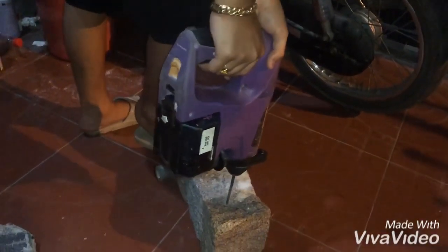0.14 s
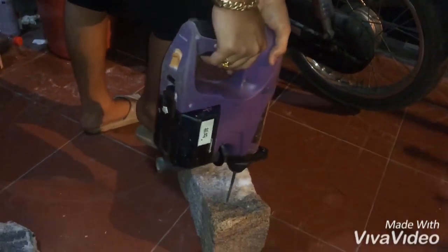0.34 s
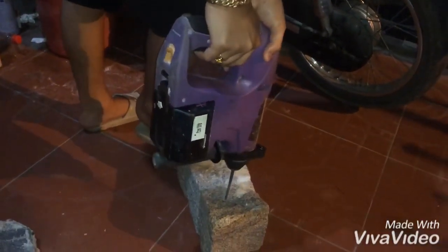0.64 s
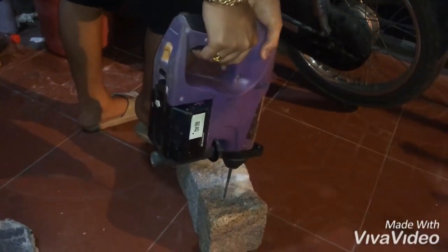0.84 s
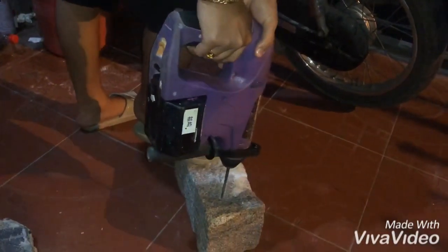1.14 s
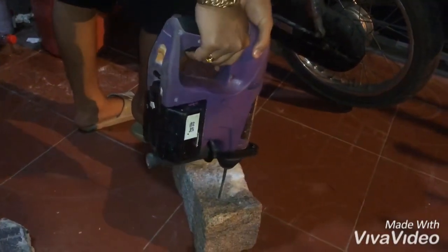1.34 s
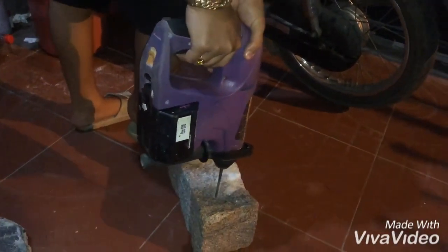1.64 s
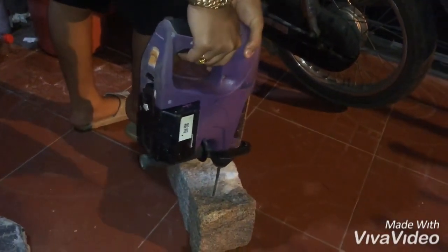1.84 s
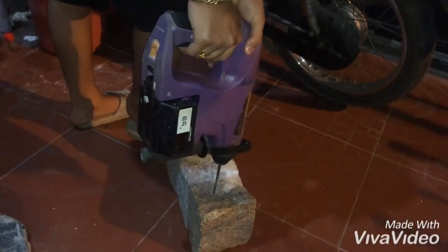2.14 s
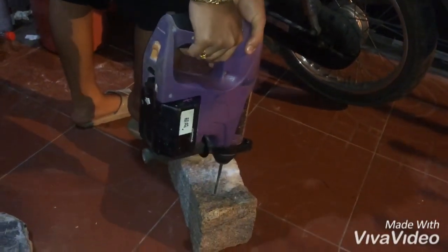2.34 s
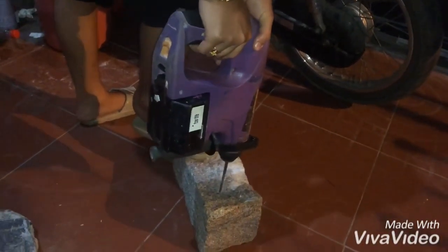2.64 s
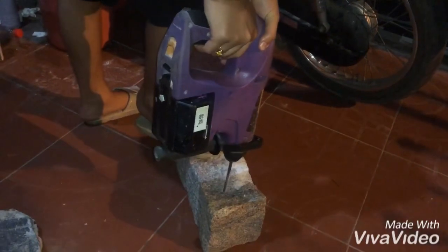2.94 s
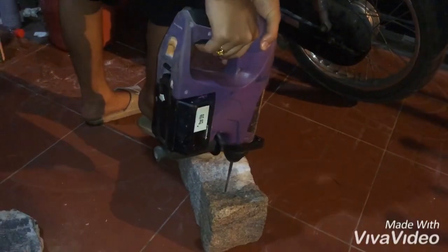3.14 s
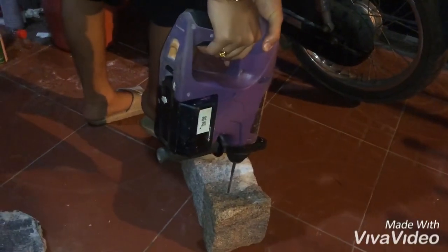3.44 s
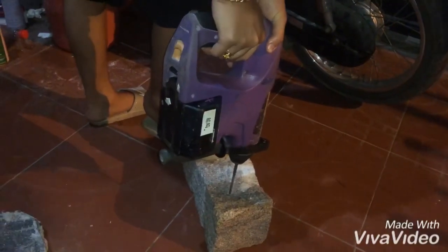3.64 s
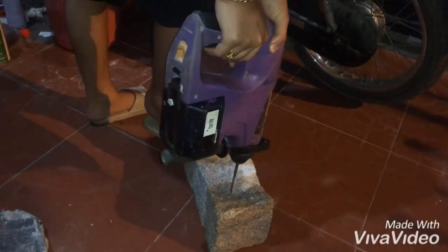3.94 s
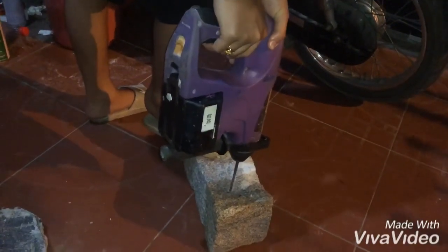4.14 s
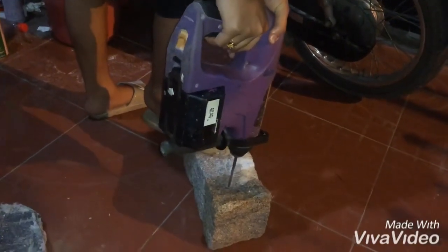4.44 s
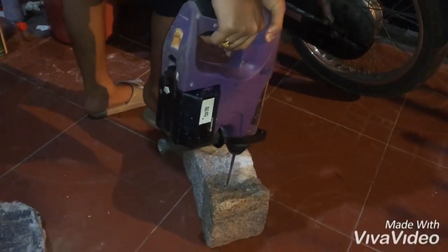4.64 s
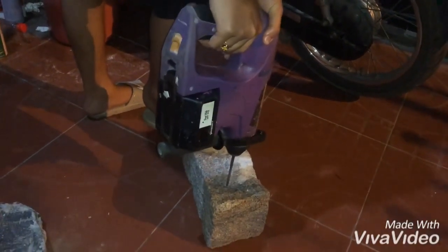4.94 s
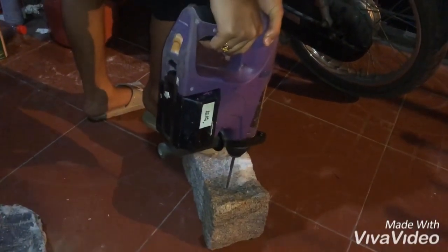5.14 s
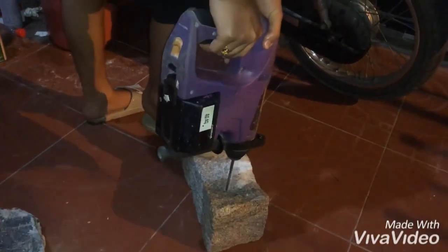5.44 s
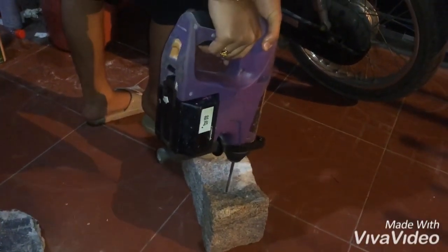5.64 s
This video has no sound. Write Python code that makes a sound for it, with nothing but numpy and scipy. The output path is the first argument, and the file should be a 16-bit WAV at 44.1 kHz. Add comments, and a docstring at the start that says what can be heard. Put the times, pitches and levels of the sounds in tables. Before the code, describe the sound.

A hammer drill bores steadily into stone, its hard, rapid hammering blurring into a rough pulsing roar over motor whirr and buzz.

```python
"""A motor's whirr and a low buzz under the hard, fast hammering of a drill boring into stone.
Once a stroke the piston knocks, the striker rattles and the bit hits; the housing booms, the steel rings.
Contact impulses excite damped modes; clatter, whirr and tick are shaped noise; buzz and gear are sines.
The bit turns three times in 17 strokes and bites harder at some angles, so the hammering pulses.
Load slows the strokes, brings out the gears and damps the bit; the stone rings less as the hole deepens."""
import sys
import numpy as np
from scipy import signal
from scipy.fft import rfft, irfft, next_fast_len
from scipy.io import wavfile
from scipy.ndimage import map_coordinates

SR = 44100
rng = np.random.default_rng(int(sys.argv[2]) if len(sys.argv) > 2 else 0)


def generate_wav(sig):
    """Save sig (samples, or channels by samples) to the path in sys.argv[1] as 16-bit PCM at SR."""
    pcm = np.round(np.clip(np.atleast_2d(sig).T, -1, 1) * 32767).astype(np.int16)
    wavfile.write(sys.argv[1], SR, pcm)


N = 255337


def undb(db):
    """Decibels to gain."""
    return 10 ** (np.asarray(db) / 20)


def level(x, db):
    """Scale to an rms level."""
    return x * undb(db) / np.sqrt(np.mean(x ** 2))


def curves(table):
    """Each column of a table, joined by straight lines in time."""
    s, *columns = np.transpose(table)
    return [np.interp(np.arange(N) / SR, s, c) for c in columns]


def noise():
    """White noise."""
    return rng.standard_normal(N)


def filtered(x, response):
    """Apply a frequency response, given as a function of Hz."""
    size = next_fast_len(N + SR // 4)  # room for ringing past the end
    hz = np.maximum(np.arange(size // 2 + 1) * SR / size, 1)
    return irfft(rfft(x, size) * response(hz), size)[:N]


def colour(x, points):
    """Shape a spectrum with straight lines in dB over log frequency."""
    hz, db = np.transpose(points)
    return filtered(x, lambda f: undb(np.interp(np.log(f), np.log(hz), db)))


def resonate(x, modes):
    """Ring a set of damped modes: the narrower the width, the longer the ring."""
    def response(f):
        return sum(undb(db) / (1 + 1j * (f * f - hz * hz) / (f * width)) for hz, width, db in modes)
    return filtered(x, response)


def bend(x, soft_hz, slow_hz, order=8):
    """A blow spreads as a bending wave: rounded by the contact, its lows arriving last."""
    def response(f):
        delay = ((slow_hz - 1j * f) / (slow_hz + 1j * f)) ** order  # all-pass
        return delay / (1 + 1j * f / soft_hz) ** 2
    return filtered(x, response)


def fade(hits, decay_s):
    """An envelope that jumps at each hit and dies away exponentially."""
    return signal.lfilter([1], [1, -np.exp(-1 / (decay_s * SR))], hits)


def chatter(spread_db, size=16):
    """Noise made of tiny contacts of unequal force, each lasting size samples."""
    force = undb(spread_db * rng.standard_normal(N // size + 1))
    return noise() * np.repeat(force, size)[:N]


def walk(rate):
    """Random values, rate a second, joined smoothly; spread near 1."""
    steps = np.arange(N) / SR * rate
    return map_coordinates(rng.standard_normal(N // 100), [steps], order=3, mode="mirror")


def effort(sag, start_db, db_per_s, db_per_sag=0):
    """Gain of one part: it drifts as the hole deepens and follows the load (Hz of stroke rate lost)."""
    return undb(start_db + db_per_s * np.arange(N) / SR + db_per_sag * sag)


# speed of the motor, sagging under load: t/s, stroke rate f/Hz
STROKE_RATE = [(0.0, 56.78), (0.47, 57.13), (0.8, 57.95), (1.19, 57.58), (1.63, 58.03), (1.98, 57.62),
               (2.53, 57.72), (3.22, 56.87), (3.45, 57.5), (4.17, 57.33), (4.28, 57.46), (4.59, 56.85),
               (5.04, 57.09), (5.29, 56.87), (5.79, 57.46)]
USUAL_STROKE_HZ = 57.3
TURNS_PER_STROKE = 3 / 17


def motor_cycle():
    """The motor drives strokes and bit together: strokes so far, turns so far, and sag in Hz."""
    hz, = curves(STROKE_RATE)
    phase = np.cumsum(hz) / SR + .146  # begins partway through a stroke
    turn = phase * TURNS_PER_STROKE - .1
    return phase, turn, USUAL_STROKE_HZ - hz


# hardness of the blow as the bit turns: lobes per turn, level/dB, angle of the hardest blow/turns
BITE = [(1, 1.26, 0.4), (2, 3.5, 0.34), (3, 2, 0.2)]


def bite(turn):
    """Hardness of the blow in dB at each angle of the bit."""
    return sum(db * np.cos(2 * np.pi * round(lobes) * (turn - angle)) for lobes, db, angle in BITE)


# shaking of the whole tool: multiple of the stroke rate, rms level/dB before the swell
SHAKE = [(1, -54.5), (2, -38.5), (3, -26.5), (4, -40), (5, -42), (6, -46), (7, -54)]


def shake(phase, turn):
    """The piston shakes the whole tool: a buzz on the stroke rate that swells after the harder blows."""
    buzz = sum(level(np.sin(2 * np.pi * round(k) * (phase - .3)), db) for k, db in SHAKE)
    return buzz * undb(0.38 * bite(turn - .06))


# colour of motor and fan: f/Hz, relative level/dB
WHIRR = [(25, -17), (95, -15), (140, 5), (190, 6), (320, 2), (600, 7), (1400, 3), (2600, 0.5), (4000, -4),
         (5500, -6), (8000, -3), (13500, 0), (16000, -23)]
GEAR_TEETH = 19  # teeth passing in a stroke


def drive_train(phase, turn, sag):
    """Motor and fan whirr, swelling with hard grinding; under load the crank gear sings at its tooth rate."""
    grinding = undb(.5 * bite(turn - .05))
    whirr = level(colour(chatter(spread_db=4.5), WHIRR) * grinding, -23.0)
    tooth_tone = level(np.cos(2 * np.pi * GEAR_TEETH * phase), 0)
    gear = tooth_tone * effort(sag, start_db=-40.5, db_per_s=0.3, db_per_sag=8)
    return whirr - gear


def contacts(phase, at, scatter_db, jitter_s):
    """One impulse a stroke at a given point of the cycle, scattered in force and slightly in timing."""
    strokes = np.arange(np.ceil(phase[-1]))
    chance = rng.standard_normal((len(strokes), 2))
    # contacts beyond either end are sent well outside, then dropped
    place = np.interp(strokes + at, phase, np.arange(N), left=-SR, right=2 * N)
    place = place + jitter_s * SR * chance[:, 0]
    inside = (place >= 0) & (place < N)
    return np.bincount(place[inside].astype(int), undb(scatter_db * chance[inside, 1]), N)


# where in the stroke the piston turns, the striker is caught and the bit is hit (cycles)
PISTON_AT, CATCH_AT, BLOW_AT = .079, .225, .538


def hammer_contacts(phase, turn):
    """Piston, striker and bit take turns in every stroke."""
    piston = contacts(phase, at=PISTON_AT, scatter_db=1.5, jitter_s=.00002)
    catch = contacts(phase, at=CATCH_AT, scatter_db=1.55, jitter_s=.00005)
    strike = contacts(phase, at=BLOW_AT, scatter_db=0.0, jitter_s=.00006)
    # the force passed on to the stone depends on how the cutting edges sit in the hole
    blow = contacts(phase, at=BLOW_AT, scatter_db=1.34, jitter_s=.00003) * undb(bite(turn))
    return piston, catch, strike, blow


def striker_rattle(catch, blow):
    """The striker rattles from the moment it is caught; crushed grit follows the blow."""
    striker = level(fade(catch, decay_s=0.0043), 0)
    grit = level(fade(blow, decay_s=0.0088), -4.5)
    # the loose parts take a moment to get going; their powers add
    power = fade(striker ** 2 + grit ** 2, decay_s=0.00049)
    return chatter(spread_db=0.34) * np.sqrt(power)


# modes of housing and chassis: f/Hz, width/Hz, relative level/dB
HOUSING = [(460.7, 14, -8.5), (580, 70, 2), (728, 56, 1), (812, 63, -17), (964, 156, -2), (1091, 98, -0.5),
           (1188, 44, -10), (1365, 81, 1), (1488, 146, -2), (1670, 43, -4.5), (1942, 180, -6.5),
           (2090, 41, -7), (3120, 230, -11.5), (3900, 290, -6.5)]


def housing_boom(piston, catch, blow, rattle, sag):
    """Each contact booms in the housing; the rattle keeps the same modes stirred."""
    # piston and catch pull the housing back, the blow pushes it forward
    force = level(blow, 0) - level(piston, -0.7) - level(catch, -2.1)
    crunch = noise() * fade(blow, decay_s=0.0016)
    rough = level(rattle, -9.0) + level(crunch, -5.5)
    rough = colour(rough, [(400, -8.5), (1500, 1.5), (5000, -1.5), (12000, -22)])  # f/Hz, level/dB
    push = bend(force, soft_hz=2600, slow_hz=710) + rough
    return level(resonate(push, HOUSING), -0.44) * effort(sag, start_db=-20.5, db_per_s=-0.17)


# colour of the rattling hiss: f/Hz, relative level/dB
RATTLE = [(100, -11), (350, -7.5), (700, 0.5), (1500, -0.5), (2600, 0.5), (3500, 1), (4600, -3.5),
          (5500, -1.5), (7000, 0.5), (10400, -8), (13500, -3), (16000, -10)]
# modes of chuck, striker and springs: f/Hz, width/Hz, relative level/dB
CHUCK = [(2730, 180, -9), (3100, 180, -4.5), (3620, 190, -2.5), (4180, 82, 0.5), (4386, 43, 2.5),
         (4820, 107, -1), (4925, 74, -10.5), (6360, 81, -4), (6740, 41, 2.5), (7600, 29, 4),
         (11600, 92, 0.5), (13210, 92, -7), (13500, 150, -3.5), (14450, 200, 0)]
# colour of the striker's tick: f/Hz, relative level/dB
TICK = [(500, -29), (2500, -1.5), (5000, -11), (7300, 2), (10000, 2), (13000, 6), (16000, -12.5)]


def clatter(rattle, strike, sag):
    """Small steel parts hiss and ring with the rattle; the striker meets the bit with a dry tick."""
    hiss = level(colour(rattle, RATTLE), -0.9)
    ringing = level(resonate(rattle, CHUCK), -6.5)
    tick = level(colour(noise() * fade(strike, decay_s=0.0009), TICK), -3)
    return (hiss + ringing + tick) * effort(sag, start_db=-20, db_per_s=-0.17)


# modes of the metal gear case: f/Hz, width/Hz, relative level/dB
GEAR_CASE = [(2220, 28, 5), (2245, 17, -2)]


def gear_case_ring(rattle, sag):
    """The rattle keeps the gear case ringing, more so under load."""
    gain = effort(sag, start_db=-34.0, db_per_s=.5, db_per_sag=2.2)
    return level(resonate(rattle, GEAR_CASE), 0) * gain


# mode of the stone block: f/Hz, width/Hz, relative level/dB
STONE = [(1496, 39, 0)]


def stone_ring(rattle, sag):
    """The rattle rings the block, less so under load and as the hole deepens."""
    gain = effort(sag, start_db=-35, db_per_s=-1.5, db_per_sag=-7)
    return level(resonate(rattle, STONE), 0) * gain


# lower and upper modes of the steel bit: f/Hz, width/Hz, relative level/dB
BIT_LOW = [(8990, 34, 0)]
BIT_HIGH = [(12170, 36, -9), (14360, 67, -1.5)]
# the bit's lower ring before its flutter: t/s, level/dB
LOW_RING = [(0, -28.5), (2.3, -29.5), (2.9, -27.5), (4.4, -24.8), (5.2, -28), (5.79, -31)]
# spread of the ring levels, and changes per second
LOW_FLUTTER_DB, HIGH_FLUTTER_DB, FLUTTER_PER_S = 2.5, 0.7, 11


def bit_ring(rattle, sag):
    """The rattle rings the steel bit; it shifts in its hole, so its rings come and go; load damps the highs."""
    low = level(resonate(rattle, BIT_LOW), 0) * undb(curves(LOW_RING)[0])
    high_gain = effort(sag, start_db=-21.5, db_per_s=-.5, db_per_sag=-1.9)
    high = level(resonate(rattle, BIT_HIGH), 0) * high_gain
    low_flutter = undb(LOW_FLUTTER_DB * walk(FLUTTER_PER_S))
    high_flutter = undb(HIGH_FLUTTER_DB * walk(FLUTTER_PER_S))
    return low * low_flutter + high * high_flutter


def scene():
    """The whole drill: its running motor, its hammering and everything that rings along."""
    phase, turn, sag = motor_cycle()
    running = shake(phase, turn) + drive_train(phase, turn, sag)
    piston, catch, strike, blow = hammer_contacts(phase, turn)
    rattle = striker_rattle(catch, blow)
    housing = housing_boom(piston, catch, blow, rattle, sag)
    steel = clatter(rattle, strike, sag) + gear_case_ring(rattle, sag) + bit_ring(rattle, sag)
    return running + housing + steel + stone_ring(rattle, sag)


TOP_HZ = 15750


def record(dry):
    """The microphone's electronics round the tallest peaks and cut the top steeply."""
    rounded = np.tanh(dry)
    top_cut = signal.ellip(10, .1, 85, TOP_HZ, fs=SR, output="sos")  # ripple and rejection in dB
    return signal.sosfilt(top_cut, rounded)


dry = scene()
out = record(dry)
generate_wav(out)
```